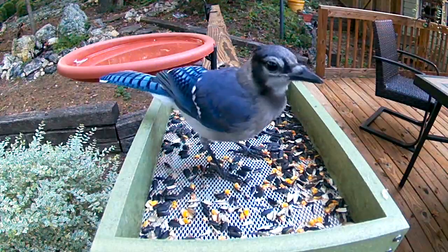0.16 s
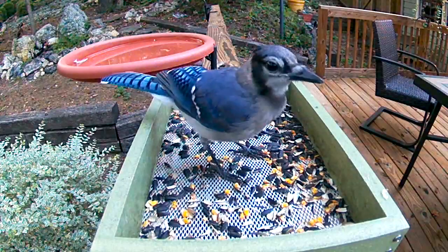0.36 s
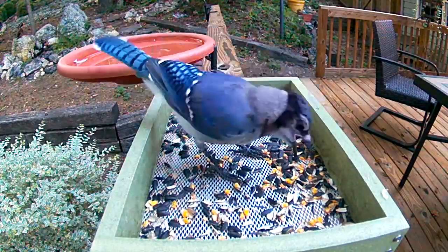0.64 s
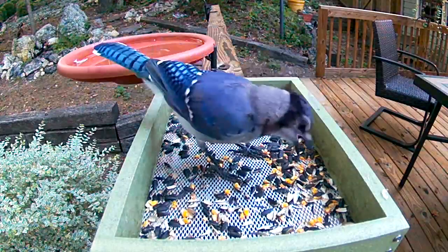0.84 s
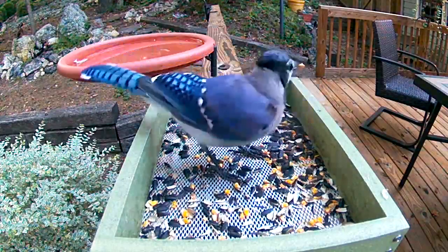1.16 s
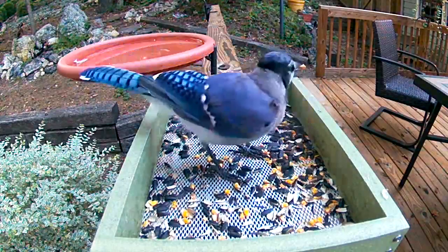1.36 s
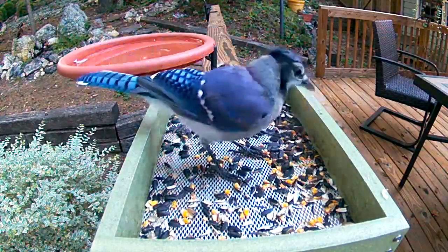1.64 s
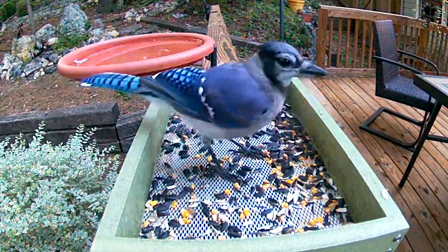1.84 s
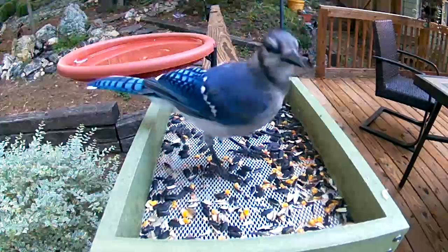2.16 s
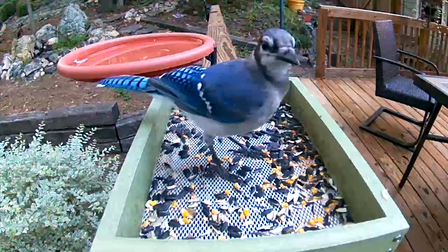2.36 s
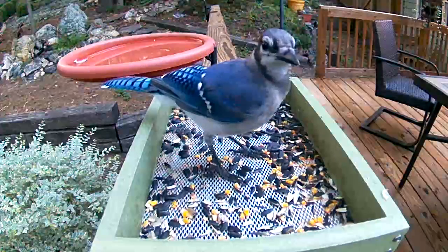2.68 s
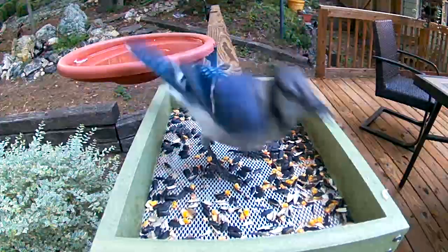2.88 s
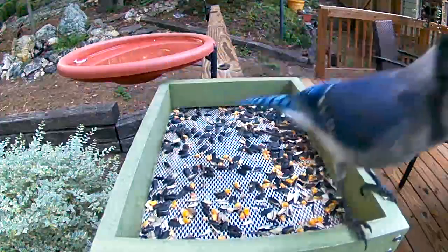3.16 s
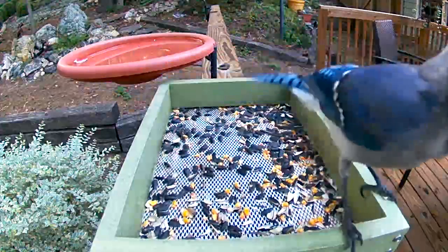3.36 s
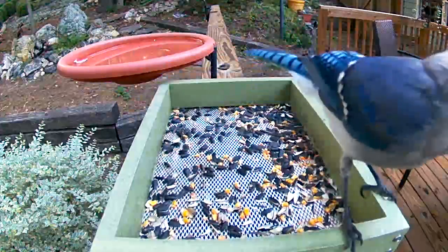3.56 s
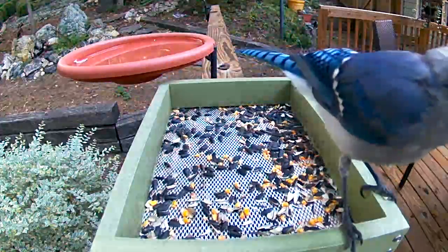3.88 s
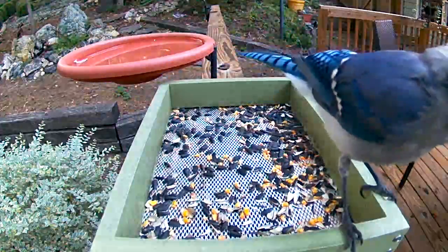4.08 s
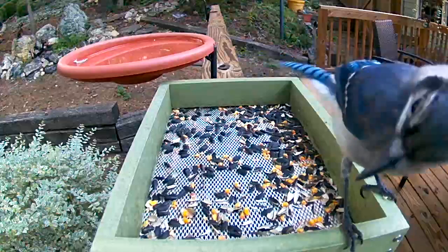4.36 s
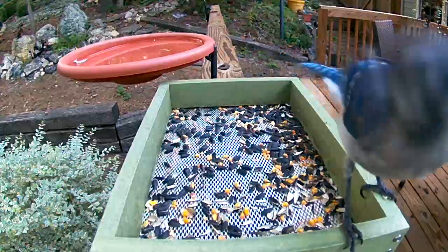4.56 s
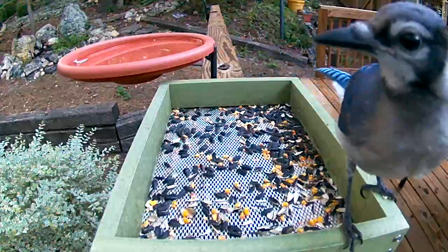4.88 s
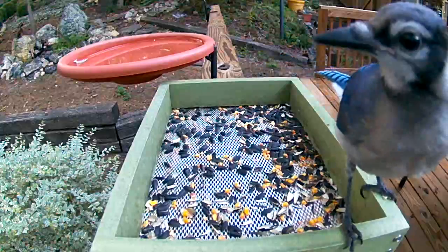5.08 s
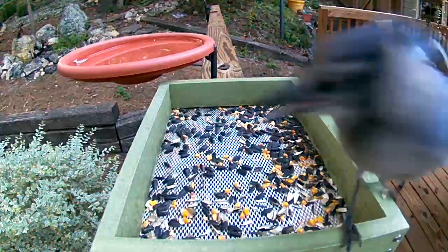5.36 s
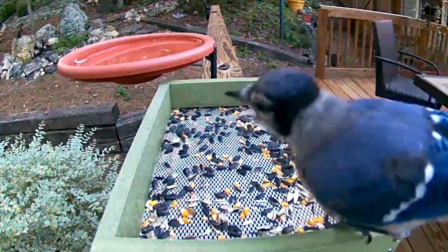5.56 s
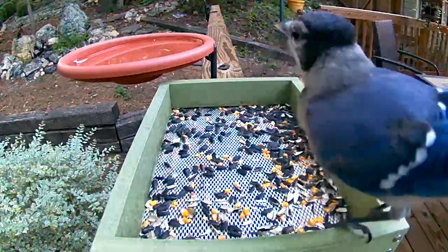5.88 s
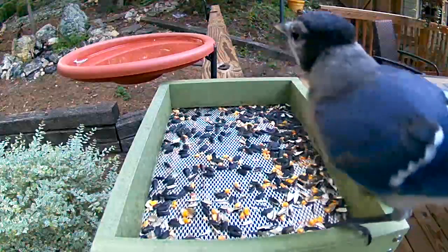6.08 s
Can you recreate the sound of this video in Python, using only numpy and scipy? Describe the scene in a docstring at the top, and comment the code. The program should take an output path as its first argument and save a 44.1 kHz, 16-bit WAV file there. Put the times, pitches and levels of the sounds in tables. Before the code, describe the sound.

Outdoors at a garden feeder, heard through a small close microphone with a dull top end. Low rumble and faint hiss open the scene, a little stronger in the first second. At 0.4 s a blue jay shouts a piercing, nasal jeer of about 0.4 s, swooping up quickly, then sagging and dropping off, buzzy with a raspy second half. Quick reflections from deck and house and a longer yard echo follow. Light claw and bill ticks come at 0.9 and around 1.4 s, fainter at 2.4. A distant wavering motor hum swells until about 2.7 s. At 2.9 s comes the second jeer, the roughest, torn and overloaded, with soft low wing gusts at 3.0-3.2 s. Quiet follows, with a barely audible tick at 4.4 s. The third jeer falls from 5.3 to 5.7 s, gritty towards its end. Around 6.05 s there is a dull tray tap and a tiny, distant rising chip.

```python
"""Three harsh, falling jeers from a blue jay on a garden feeder tray, right beside a small camera microphone.
Each is a buzzy tone whose fourth partial carries the voice, roughened by pulsed rasp and the syrinx's second side.
Quick reflections come off deck and house, and a longer echo off the yard; wingbeats buffet the microphone.
Claws and bill tick on the tray as noise crackles and a ringing sine; a small bird's swept sine chips far off.
Behind lie low outdoor rumble and faint hiss of coloured noise, and the wavering sines of a distant motor that swells."""
import sys
import numpy as np
from scipy import signal
from scipy.fft import rfft, irfft, next_fast_len
from scipy.io import wavfile

SR = 44100
rng = np.random.default_rng(int(sys.argv[2]) if len(sys.argv) > 2 else 0)


def unload_wav(signal):
    """Save mono or channel-first audio to the path in sys.argv[1] as 16-bit WAV at rate SR, clipped to [-1, 1]."""
    wavfile.write(
        sys.argv[1],
        SR,
        np.round(np.clip(np.atleast_2d(signal).T, -1, 1) * 32767).astype(np.int16),
    )


N = 274865
T = np.arange(N) / SR   # time [s]

# Levels are relative to the gains and trims in the functions; noise colours set shape only.
# the jeers: (start [s], end [s], swoop [Hz], drop [Hz], fourth partial [dB], odd partials [dB],
# second and sixth partials [dB], eighth partial [dB], time until the eighth is full [s], rasp while clear [dB])
JEERS = [(0.407, 0.817, 319.2, 110, -24.5, -38, -40.5, -34.5, 0.11, -53.5),
         (2.872, 3.31, 438.9, 130, -23.5, -37, -39, -42.5, 0.2, -41.5),
         (5.289, 5.666, 401, 75, -23, -35, -40.5, -36.5, 0.14, -41)]
# share of the odd partials, one row per jeer: (first [dB], third [dB], fifth [dB], seventh [dB])
ODD_PARTIAL_SHARES = [(-23.5, -9, -7.5, -4), (-8, -2.5, -7.5, -7.5), (-18.5, 0.5, -7, -8)]
# sagging pitch of each jeer, before its swoop and drop: (time [s], frequency [Hz])
FIRST_JEER_PITCH = [(0.445, 936.5), (0.505, 920.6), (0.535, 897), (0.681, 833), (0.711, 824),
                    (0.788, 779.8)]
SECOND_JEER_PITCH = [(2.905, 912.6), (2.969, 922.2), (3.017, 916.3), (3.053, 895), (3.071, 897),
                     (3.095, 865.9), (3.159, 852.9), (3.191, 821.5), (3.27, 796.7)]
THIRD_JEER_PITCH = [(5.32, 930.8), (5.356, 927.6), (5.448, 864.3), (5.482, 863.5), (5.57, 830.4),
                    (5.594, 807), (5.62, 817.7), (5.64, 798)]
# moments when the fourth partial falters: (time [s], half width [s], loss [dB])
FALTERS = [(0.52, 0.036, 9), (0.795, 0.022, 12), (2.925, 0.028, 5.5), (3.285, 0.04, 5), (5.303, 0.009, 11),
           (5.37, 0.009, 13), (5.455, 0.036, 5.5)]
# spells when the voice turns rough:
# (start [s], end [s], rasp [dB], overload rumble [dB], loss of the odd partials [dB])
ROUGH_SPELLS = [(0.406, 0.461, -34.5, -64.5, 7), (0.531, 0.591, -44, -62.5, 1),
                (0.589, 0.762, -42, -55, 14.5), (2.873, 2.919, -41, -68, 13.5),
                (2.951, 3.043, -34, -48.5, 3), (3.066, 3.175, -32.5, -41.5, 13.5),
                (3.244, 3.293, -34, -50.5, 4), (5.298, 5.325, -38, -60, 7),
                (5.416, 5.527, -39.5, -59.5, 5.5), (5.53, 5.603, -38.5, -47.5, 2.5)]
# bursts of the second side of the syrinx at a lower, falling pitch of its own:
# (start [s], end [s], first frequency [Hz], last frequency [Hz], level [dB])
SECOND_SIDE_BURSTS = [(0.581, 0.755, 703, 644.1, -35), (2.957, 2.988, 560, 482, -47.5),
                      (3.074, 3.164, 760, 724, -32), (5.42, 5.52, 470, 402.6, -37),
                      (5.517, 5.579, 298.2, 245.3, -33.5)]
# throat colour on the second side's sum and difference tones: (frequency [Hz], level [dB])
THROAT_COLOUR = [(300, -6), (450, -16), (700, -9), (1000, -4), (1400, -6), (2300, -5), (3100, 2.5),
                 (4100, -2), (5100, -7.5), (6100, 1), (7200, -10)]
# rasp of the voice, the low rumble that comes with it as the microphone overloads,
# and the fraying of the partials: (frequency [Hz], density [dB per Hz])
RASP_COLOUR = [(700, -37), (1200, -19), (1750, -12), (2400, -1.5), (3000, -5.5), (3700, 3.5), (4200, 2.5),
               (5100, -17.5), (6300, -3.5), (7100, 6.5), (7600, -24.5)]
OVERLOAD_RUMBLE_COLOUR = [(25, -10.5), (100, -4), (300, 0.5), (700, 1.5), (1100, 3), (1800, -25)]
FRAY_COLOUR = [(60, -1.0), (200, -1.5), (500, -5.5), (800, -12.0)]
# colour of the reflections off deck and house, and of the long yard echo: (frequency [Hz], level [dB])
WALL_COLOUR = [(300, 0.0), (1600, 0), (2400, -0.5), (3300, -4), (4300, 0), (7000, -1.5)]
YARD_COLOUR = [(500, -24), (1600, -17.5), (2550, -16.5), (2950, -5), (3270, -6.5), (3600, -6.5),
               (5000, -12), (7000, -15.5)]
# wingbeats at the microphone as the bird hops to the rim: (time [s], level [dB])
WINGBEATS = [(3.02, -56), (3.075, -41.5), (3.15, -46)]
# wind of the wingbeats: (frequency [Hz], density [dB per Hz])
WIND_COLOUR = [(25, -3.5), (70, 0), (130, -6.5), (220, -8), (400, -27.5)]
# claws and bill on tray and seeds: (time [s], level [dB], tray thud re that level [dB])
TICKS = [(0.9023, -51.5, -8), (0.9353, -52, -12), (1.3558, -63.5, -12), (1.4341, -62, -13),
         (1.4511, -55.5, -12), (2.3594, -69, -10), (4.3594, -73, -4), (6.0247, -63, 6)]
# crackle of the touches: (frequency [Hz], density [dB per Hz])
TICK_COLOUR = [(500, -6), (1200, -6), (1900, -1.5), (3000, -5), (4500, -6.5), (6400, -1), (7500, -8)]
# a small bird's rising chip: (time [s], frequency [Hz], level [dB])
CHIP = [(6.066, 5450, -71), (6.07, 6320, -56), (6.074, 6860, -60.5), (6.081, 7010, -73),
        (6.088, 7350, -92.5)]
# background level, louder at first: (time [s], rumble level [dB], hiss level [dB])
BACKGROUND_LEVEL = [(0, -56.5, -84), (0.38, -55, -79.5), (0.9, -64.5, -91), (6.2, -65, -91)]
# colours of the rumble and the hiss: (frequency [Hz], density [dB per Hz])
RUMBLE_COLOUR = [(13, -35.5), (22, 2), (98, -2.5), (196, -13), (246, -10), (271, -16), (321, -11.5),
                 (395, -18.5), (477, -16), (514, -20.5), (587, -19), (2000, -38), (2600, -65.5),
                 (4400, -120)]
HISS_COLOUR = [(900, -6.5), (1500, -2.5), (2500, 2.5), (4500, 1), (6500, 2), (7400, -6)]
# lines of the distant motor: (frequency [Hz], level [dB])
MOTOR_LINES = [(236.9, -81.5), (306.8, -80.5), (419.9, -80.5), (484.5, -78.5), (619.1, -82.5),
               (726.7, -88.5), (839.8, -83)]
# swell of the motor: (time [s], level [dB])
MOTOR_SWELL = [(0, -13.5), (1.85, -7.5), (2.2, 0.5), (2.7, 3), (3.4, -26), (6.2, -12.5)]

# every jeer swoops up into its pitch and drops off it at the end
SWOOP_S, DROP_S = 0.037, 0.04
# it opens and closes quickly
ATTACK_S, ATTACK_DB, RELEASE_S, RELEASE_DB = 0.021, 23, 0.024, 21
# the fourth partial speaks later than the rest; the eighth comes last and goes first
FOURTH_ATTACK_S, FOURTH_ATTACK_DB = 0.036, 15.5
EIGHTH_SWELL_DB, EIGHTH_FADE_S, EIGHTH_FADE_DB = 24, 0.04, 29.5
# the second and sixth partials grow throughout and lead each swoop; the rasp builds behind them
EVEN_GROWTH_DB, LEAD_S, EVEN_LEAD_DB, RASP_LAG_DB = 1.5, 0.028, 8, 8
ODD_TAKE_OVER = 0.12   # dB gained by the odd partials for each dB that faltering takes from the fourth
EVEN_LOSS_SHARE = 0.2   # part of the odd partials' rough loss that the second and sixth suffer too
CLEAR_OVERLOAD_DB, TURN_S = -66.5, 0.006   # overload rumble between the spells; time to change over
# share of the rasp's power that frays the partials: always, extra at the start, and how long that lasts
CLING, ONSET_CLING, SETTLE_S = 0.16, 0.27, 0.1
GUST_RISE_DB_PER_S, GUST_FALL_DB_PER_S = 907.5, 176
TRAY_HZ, TRAY_T60_S = 630, 0.055
CUTOFF_HZ = 7520


def jay(jitter=0.0025, rough_jitter=0.013, shimmer_db=0.24, harsh_shimmer_db=9.5, tone_shimmer_db=1.0,
        waver_db=2.5, sputter_db=1.5, patchy_db=2.5, pulsing=0.24, locked_db=-2.5):
    """Three jeers: partials of one syrinx side, the second beating against it, rasp and overload rumble."""
    pitch, open_db, levels = gesture()
    tone_db = levels[3]   # the fourth partial
    rasp_db, overload_db = roughness()
    # the harsher the voice, the more unevenly its membranes swing
    harsh = np.minimum(from_db(rasp_db - tone_db), .5)
    unevenness = jitter * drift(50) + rough_jitter * harsh * drift(500)
    phase = phase_of(pitch * (1 + unevenness))
    voice, swing = 0, 0
    for k, level_db in enumerate(levels, 1):
        if k == 4:
            flutter_db = tone_shimmer_db * drift(100)
        else:
            flutter_db = (shimmer_db + harsh_shimmer_db * harsh) * drift(70) + waver_db * drift(15)
        partial = np.cos(k * phase + rng.uniform(0, 2 * np.pi))
        voice = voice + np.sqrt(2) * from_db(level_db + flutter_db) * partial
        # before the throat favours the fourth, the partials of the swing are more alike
        swing = swing + np.minimum(from_db((level_db - tone_db) / 3), 1) * partial
    # rasp is partly chaotic swinging, which frays each partial, and partly a puff of turbulence each cycle
    frayed = rms_one(swing) * noise(FRAY_COLOUR)
    sputter = from_db(sputter_db * drift(60) + patchy_db * drift(22))
    puffs = rms_one((1 + pulsing * np.cos(phase)) * sputter)
    start = per_jeer(JEERS)[0]
    share = np.clip(CLING + ONSET_CLING * eased(T - start, SETTLE_S), 0, 1)
    rasp = np.sqrt(share) * frayed + np.sqrt(1 - share) * puffs * noise(RASP_COLOUR)
    overload_rumble = puffs * noise(OVERLOAD_RUMBLE_COLOUR)
    rough = from_db(rasp_db) * rasp + from_db(overload_db) * overload_rumble
    # while the second side holds a pitch of its own there is less chaos
    locked = sum(between(a, b) for a, b, *_ in SECOND_SIDE_BURSTS)
    rough = rough * from_db(locked_db * locked)
    calling = sum(between(a, b) for a, b, *_ in JEERS)
    return (voice + second_side(swing) + rough) * from_db(open_db) * calling


def gesture():
    """Pitch, opening in dB, and the levels of the eight partials; all jeers share one shape."""
    (start, end, swoop_hz, drop_hz, fourth_db, odd_db,
     even_db, eighth_db, swell_s, _) = per_jeer(JEERS)
    first, third, fifth, seventh = per_jeer(ODD_PARTIAL_SHARES)
    since, left = T - start, end - T
    sag, = in_time(np.vstack([FIRST_JEER_PITCH, SECOND_JEER_PITCH, THIRD_JEER_PITCH]))
    pitch = sag - swoop_hz * eased(since, SWOOP_S) - drop_hz * eased(left, DROP_S)
    open_db = -ATTACK_DB * eased(since, ATTACK_S) - RELEASE_DB * eased(left, RELEASE_S)

    falter_db = sum(db * np.exp(-np.minimum(((T - s) / width) ** 2, 20)) for s, width, db in FALTERS)
    loss_db = sum(loss * between(a, b, TURN_S) for a, b, _, _, loss in ROUGH_SPELLS)
    fourth_db = fourth_db - FOURTH_ATTACK_DB * eased(since, FOURTH_ATTACK_S) - falter_db
    eighth_db = eighth_db - EIGHTH_SWELL_DB * (1 - np.clip(since / swell_s, 0, 1) ** 2)
    eighth_db = eighth_db - EIGHTH_FADE_DB * eased(left, EIGHTH_FADE_S)
    progress = np.clip(since / (end - start), 0, 1)
    even_db = even_db + EVEN_GROWTH_DB * (progress - .5) - EVEN_LOSS_SHARE * loss_db
    even_db = even_db + EVEN_LEAD_DB * eased(since, LEAD_S)
    odd_db = odd_db + ODD_TAKE_OVER * falter_db - loss_db
    levels = [odd_db + first, even_db - 2.5, odd_db + third, fourth_db,
              odd_db + fifth, even_db - 3.0, odd_db + seventh, eighth_db]
    return pitch, open_db, levels


def roughness():
    """Levels of the rasp and of the overload rumble that comes with it, changed in each rough spell."""
    opening, *_, clear_db = per_jeer(JEERS)
    rasp_db, overload_db = clear_db, CLEAR_OVERLOAD_DB
    for start, end, spell_db, spell_overload_db, _ in ROUGH_SPELLS:
        rough = between(start, end, TURN_S)
        rasp_db = rasp_db + rough * (spell_db - clear_db)
        overload_db = overload_db + rough * (spell_overload_db - CLEAR_OVERLOAD_DB)
    return rasp_db - RASP_LAG_DB * eased(T - opening, LEAD_S), overload_db


def second_side(swing, wander=0.011, own_tone=0.33, second_db=-9.5, third_db=-9.0):
    """Both sides share one air stream, so the lower one chops the upper into sum and difference tones."""
    points = []
    for a, b, first, last, db in SECOND_SIDE_BURSTS:
        points += [(a, first, db), (b, last, db)]
    hz, level_db = in_time(points)
    phase = phase_of(hz * (1 + wander * drift(100)))
    chop = np.cos(phase) + from_db(second_db) * np.cos(2 * phase) + from_db(third_db) * np.cos(3 * phase)
    sounding = sum(between(a, b) for a, b, *_ in SECOND_SIDE_BURSTS)
    tones = coloured(sounding * chop * (own_tone + swing), THROAT_COLOUR)
    # the level holds within the bursts, not over the whole length
    return from_db(level_db) * rms_one(tones) * np.sqrt(np.mean(sounding))


def echo(x, t60, delay_s, build_s):
    """Scattered reflections that build up after a delay and die away."""
    t = T[:SR * 2]
    build = 1 - np.exp(-np.maximum(t - delay_s, 0) / build_s)
    tail = rng.standard_normal(len(t)) * from_db(-60 * t / t60) * build
    return signal.fftconvolve(x, tail / np.sqrt(np.sum(tail ** 2)))[:N]


def wing_wind():
    """Each wingbeat pushes a soft gust over the microphone port."""
    gusts = 0
    for s, db in WINGBEATS:
        drop_db = np.maximum(GUST_RISE_DB_PER_S * (s - T), GUST_FALL_DB_PER_S * (T - s))
        gusts = gusts + from_db(db - drop_db)
    return gusts * noise(WIND_COLOUR)


def tray_ticks(tick_t60=0.042, tick_db=-6.5):
    """Each touch is a short crackle of seed and a dull ring of the tray."""
    crackle, thud = np.zeros(N), np.zeros(N)
    t = T[:SR // 10]
    ring = np.sin(2 * np.pi * TRAY_HZ * t)
    for s, level_db, tray_db in TICKS:
        span = slice(int(s * SR), int(s * SR) + len(t))
        crackle[span] += from_db(level_db + tick_db - 60 * t / tick_t60)
        thud[span] += from_db(level_db + tray_db - 60 * t / TRAY_T60_S) * ring
    return crackle * noise(TICK_COLOUR) + thud


def far_chip():
    """One quick upward whistle, smeared by the trees."""
    hz, level_db = in_time(CHIP)
    sounding = between(CHIP[0][0], CHIP[-1][0])
    chip = np.sqrt(2) * from_db(level_db) * sounding * np.sin(phase_of(hz))
    return chip + echo(chip, t60=0.34, delay_s=0.0013, build_s=0.002)


def background(hiss_trim_db=7.0, gust_db=0.5, motor_db=-2.5):
    """Low outdoor rumble, a faint hiss and the wavering lines of a far motor."""
    rumble_db, hiss_db = in_time(BACKGROUND_LEVEL)
    swell_db, = in_time(MOTOR_SWELL)
    rumble = from_db(rumble_db + gust_db * drift(14)) * noise(RUMBLE_COLOUR)
    hiss = from_db(hiss_db + hiss_trim_db) * noise(HISS_COLOUR)
    motor = 0
    for hz, db in MOTOR_LINES:
        line = np.sin(phase_of(hz * (1 + 0.0054 * drift(4.2))))
        motor = motor + from_db(db + 2.5 * drift(2.4)) * line
    return rumble + hiss + np.sqrt(2) * from_db(swell_db + motor_db) * motor


def from_db(db):
    """Decibels to gain."""
    return 10 ** (np.asarray(db) / 20)


def rms_one(x):
    """Scale to unit rms."""
    return x / np.sqrt(np.mean(x ** 2) + 1e-20)


def in_time(rows):
    """Each column of a table after its times, joined by straight lines in time."""
    s, *columns = np.transpose(rows)
    return [np.interp(T, s, c) for c in columns]


def per_jeer(rows):
    """Each column of a table with one row per jeer, held from just before that jeer until the next."""
    changes = [row[0] - .5 for row in JEERS[1:]]
    return np.array(rows)[np.searchsorted(changes, T)].T


def between(start, end, edge_s=0.0027):
    """One from start to end, with soft edges."""
    return np.clip(np.minimum(T - start, end - T) / edge_s + .5, 0, 1)


def eased(elapsed, length):
    """Falls from one to zero over a length of time, quickly at first."""
    return np.clip(1 - elapsed / length, 0, 1) ** 2


def phase_of(hz):
    """Running phase of a moving frequency."""
    return 2 * np.pi * np.cumsum(hz) / SR


def coloured(x, spectrum):
    """Shape a sound by a spectrum that falls 20 dB per octave beyond its ends."""
    size = next_fast_len(len(x))
    hz, db = np.transpose(spectrum)
    octave = np.log2(np.maximum(np.fft.rfftfreq(size, 1 / SR), 1))
    beyond = np.abs(octave - np.clip(octave, np.log2(hz[0]), np.log2(hz[-1])))
    gain = from_db(np.interp(octave, np.log2(hz), db) - 20 * beyond)
    return irfft(rfft(x, size) * gain, size)[:len(x)]


def noise(spectrum):
    """Coloured noise of unit rms."""
    return rms_one(coloured(rng.standard_normal(N), spectrum))


def drift(rate):
    """Smooth random wander of unit rms: noise through two equal low-pass poles at `rate` Hz."""
    # made at an eighth of the sample rate; the first 4000 values let the filter settle
    r = np.exp(-16 * np.pi * rate / SR)
    slow = signal.lfilter([1], [1, -2 * r, r * r], rng.standard_normal(N // 8 + 4002))[4000:]
    return np.interp(np.arange(N) / 8, np.arange(len(slow)), rms_one(slow))


def scene(bird_db=0.5, deck_db=-22.0, yard_db=-33.5):
    """The close bird, quick reflections from deck and house, the long echo of the yard, and the rest."""
    bird = from_db(bird_db) * jay()
    deck = from_db(deck_db) * echo(coloured(bird, WALL_COLOUR), t60=0.27, delay_s=0.016, build_s=0.0027)
    yard = from_db(yard_db) * echo(coloured(bird, YARD_COLOUR), t60=0.89, delay_s=0.027, build_s=0.03)
    return (bird + deck + yard + wing_wind() + tray_ticks() + far_chip() + background())[None, :]


def record(dry, top=0.13):
    """The close screams overload the small microphone, which flattens their peaks; the top is cut steeply."""
    flattened = dry / (1 + (dry / top) ** 4) ** .25
    steep_cut = signal.ellip(14, .1, 80, CUTOFF_HZ, fs=SR, output="sos")
    return signal.sosfilt(steep_cut, flattened)


dry = scene()
out = record(dry)
unload_wav(out)
```